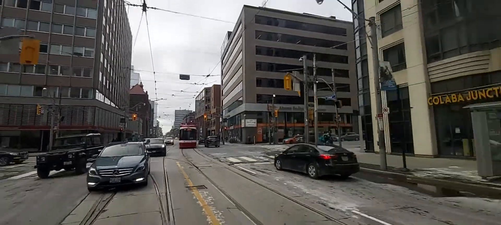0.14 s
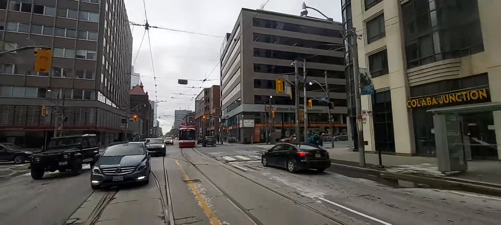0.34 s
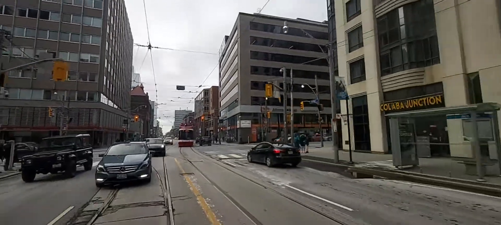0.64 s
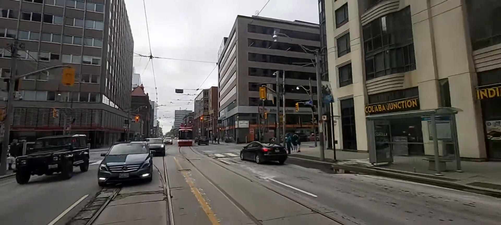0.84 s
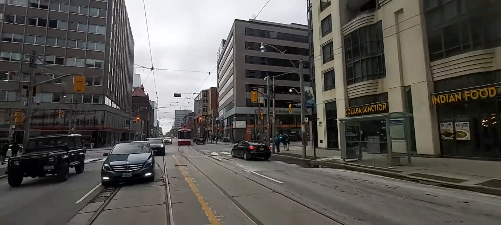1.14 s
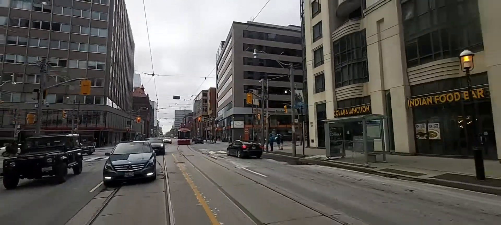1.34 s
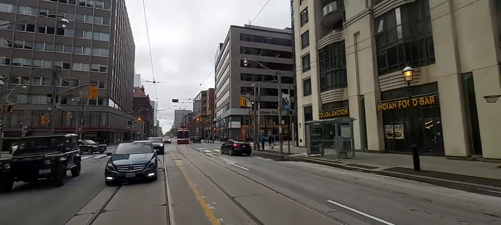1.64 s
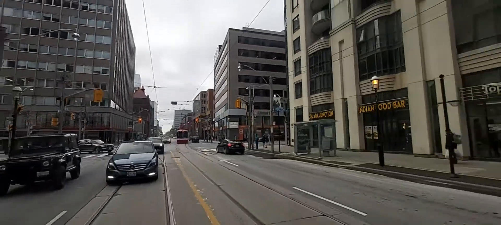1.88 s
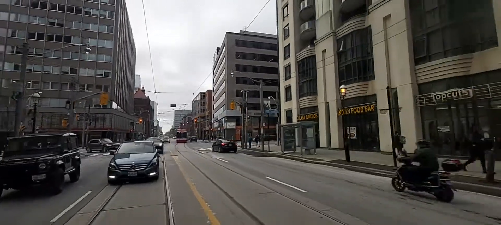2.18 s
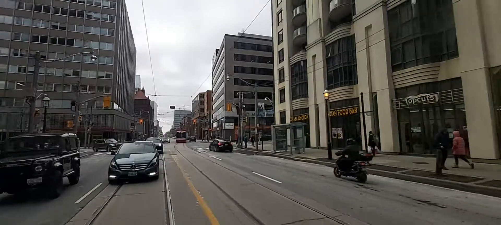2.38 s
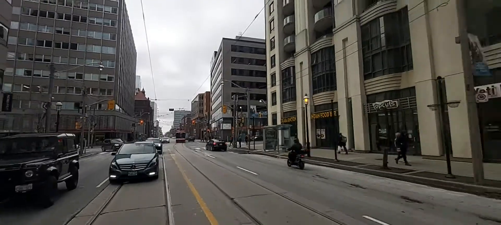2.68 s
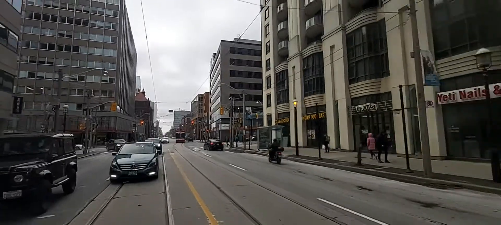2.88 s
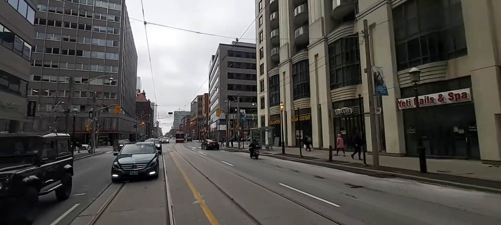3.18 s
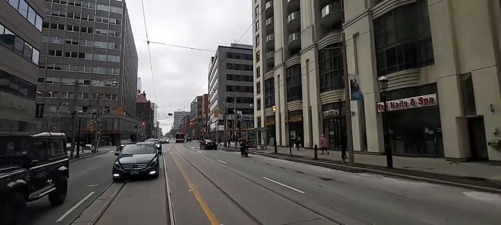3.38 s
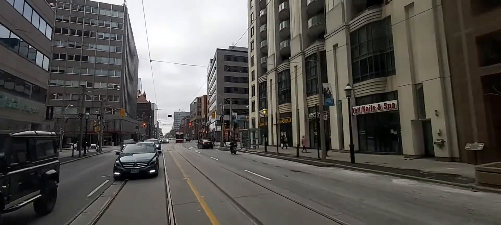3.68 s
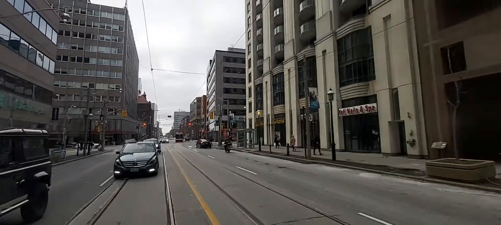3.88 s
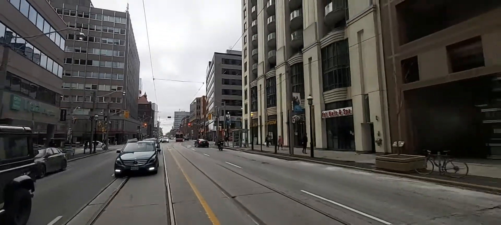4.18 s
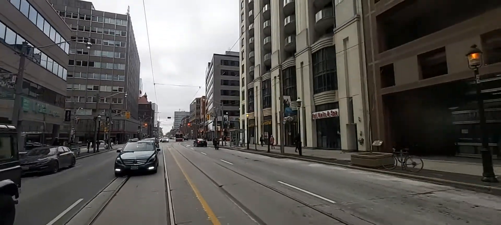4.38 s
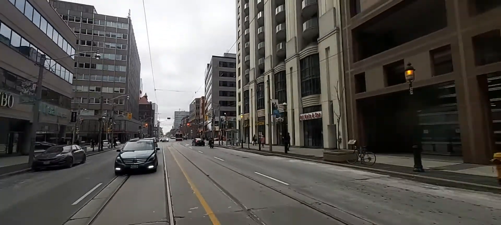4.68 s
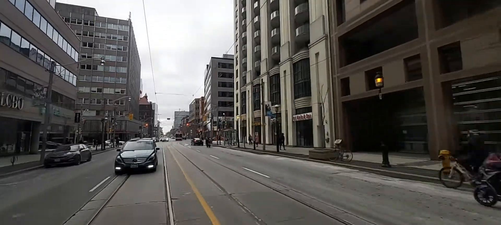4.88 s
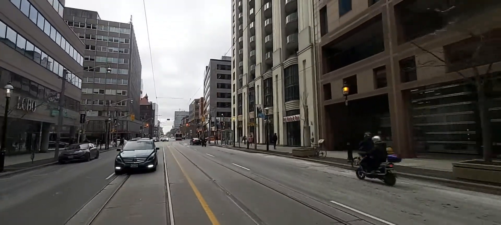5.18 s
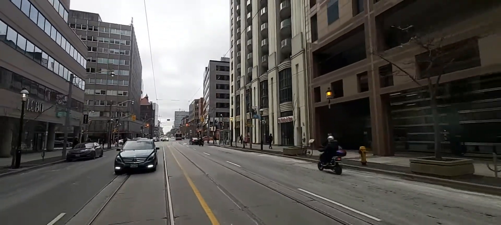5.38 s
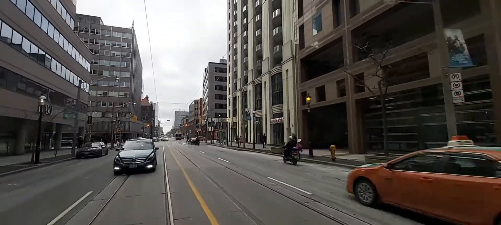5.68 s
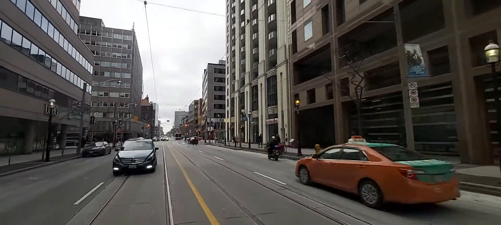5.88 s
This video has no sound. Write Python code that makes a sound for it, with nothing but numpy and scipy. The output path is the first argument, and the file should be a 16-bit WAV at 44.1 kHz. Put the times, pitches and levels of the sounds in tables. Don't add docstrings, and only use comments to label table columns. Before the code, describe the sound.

Inside a moving streetcar, microphones close behind the window, right side louder than left. A deep floor boom and soft wheel roar continue throughout, with very faint gear, fan and motor hum underneath. Small bumps and ticks open; from about 0.4 to 0.8 seconds a faint, thin flange squeal rises and catches twice. At 0.8 to 1.3 heavy thumps strike, with panels knocking and a sharp rattle near 1.15. It eases to light ticks, then a thud at 2.0 and a tight cluster of thumps and clatter at 2.45 to 2.8. Another bump at 3.2 leads to the heaviest run, 3.6 to 4.0, the body lurching and trim rattling. From 4.1 to 5.2 it is calmer, mostly rumble. Moderate thuds and knocks return at 5.25 to 5.85, while muffled traffic hiss, swelling faintly earlier, lifts and is loudest around 6.0.

```python
import sys
import numpy as np
from scipy import signal
from scipy.fft import next_fast_len
from scipy.io import wavfile
from scipy.ndimage import uniform_filter1d

SR = 44100
rng = np.random.default_rng(int(sys.argv[2]) if len(sys.argv) > 2 else 0)


def dump_mix(stems):
    frames = np.atleast_2d(stems).T
    limited = np.clip(frames, -1, 1)
    pcm = np.round(limited * 32767).astype(np.int16)
    wavfile.write(sys.argv[1], SR, pcm)


def voltage_ratio(decibels):
    exponent = np.asarray(decibels, float) / 20
    return 10 ** exponent


N = 266364


def rms_one(x):
    return x / np.sqrt(np.mean(x ** 2) + 1e-20)


def in_time(rows, **ends):
    s, level_db = np.transpose(rows)
    return np.interp(np.arange(N) / SR, s, level_db, **ends)


def at_hz(points, hz):
    f, value = np.transpose(points)
    return np.interp(np.log(hz), np.log(f), value)


def drift(rate):
    r = np.exp(-80 * np.pi * rate / SR)
    white = rng.standard_normal(N // 40 + 2002)
    slow = signal.lfilter([1], [1, -2 * r, r * r], white)[2000:]
    return np.interp(np.arange(N) / 40, np.arange(len(slow)), rms_one(slow))


def resonate(x, modes):
    out = 0
    for k, (hz, width, db) in enumerate(modes):
        r = np.exp(-np.pi * width / SR)
        gain = (1 - r * r) / 2
        section = [gain, 0, -gain, 1, -2 * r * np.cos(2 * np.pi * hz / SR), r * r]
        out = out + (-1) ** k * voltage_ratio(db) * signal.sosfilt([section, section], x + 1e-18)
    return out


def dying(times, heights, t60_s, rise_s):
    out = np.zeros(N)
    for s, height in zip(times, heights):
        i = round(s * SR)
        t = np.arange(min(N - i, SR // 3)) / SR
        out[i:i + len(t)] += height * (1 - np.exp(-t / rise_s)) * voltage_ratio(-60 * t / t60_s)
    return out


def swings(times, levels_db, pitches, swell_s, early_s):
    out, t = np.zeros(N), np.arange(SR // 4) / SR
    swell = (t / swell_s * np.exp(1 - t / swell_s)) ** 2.5
    for at, db, hz in zip(times, levels_db, pitches):
        swing = voltage_ratio(db) * swell * np.sin(2 * np.pi * hz * t)
        i = round((at - early_s) * SR)
        out[i:i + len(t)] += swing[:N - i]
    return out


# f/Hz, likeness (1 same, -1 opposite)
PORT_LIKENESS = [(140, 0.94), (250, 1), (410, 0.75), (620, 0.73), (820, -0.24), (1100, 0.096),
                 (1400, -0.059), (1800, -0.22), (2300, -0.011), (15000, -0.055)]
BAND_EDGES_HZ = 140 * 2 ** np.arange(0, 7, .32)


def stereo_bands(spectrum, patchy_db, envelope=lambda hz: 1, above=0, size=1):
    out, white = 0, rng.standard_normal((2, 2, N))
    edges = BAND_EDGES_HZ[BAND_EDGES_HZ > above][::-size][::-1]
    for k, (low, high) in enumerate(zip(edges, edges[1:])):
        hz = np.sqrt(low * high)
        band = signal.butter(2, [low, high], "band", fs=SR, output="sos")
        mid, side = signal.sosfilt(band, white[k % 2])
        alike = np.clip(at_hz(PORT_LIKENESS, hz), -1, 1)
        gain = voltage_ratio(at_hz(spectrum, hz) + patchy_db * drift(9.7)) * envelope(hz)
        out = out + gain * (np.sqrt(1 + alike) * mid + np.sqrt(1 - alike) * side * [[1], [-1]])
    return out


# t/s, sway level/dB
TRACK_SHAKE = [(0.0, -31.5), (0.76, -33), (0.79, -21), (1.39, -24), (1.5, -29), (1.66, -25.5),
               (1.72, -29.5), (2.22, -30), (2.49, -18), (3.55, -27.5), (3.83, -16), (3.92, -29),
               (3.95, -25.5), (4.91, -35), (5.67, -22), (5.7, -28), (5.92, -31.5), (6.04, -40)]


def track_shake():
    return in_time(TRACK_SHAKE)


def ringing_modes(modes, level_db, even):
    ringing = rms_one(resonate(rng.standard_normal(N + SR), modes)[SR:])
    swell = uniform_filter1d(np.abs(signal.hilbert(ringing, next_fast_len(N))[:N]), size=600)
    ringing = rms_one(ringing / (swell + 0.053) ** even)
    apart = rms_one(resonate(rng.standard_normal(N), modes))
    return voltage_ratio(level_db) * (ringing * np.ones((2, 1)) + voltage_ratio(-17.5) * apart * [[1], [-1]])


# f/Hz, width/Hz, level/dB
SWAY_MODES = [(54.1, 13.7, -1), (68.87, 10, 1)]
# f/Hz, width/Hz, level/dB
FLOOR_MODES = [(101.7, 29, 7), (125.9, 36, 3)]
# t/s, sway level/dB
BODY_LURCHES = [(.77, -18), (1.06, -13), (1.262, -30), (1.62, -27), (2.39, -26), (2.61, -35), (2.72, -23),
                (3.01, -22.5), (3.36, -31), (3.929, -10.5), (4.28, -31), (5.64, -33)]


def body_and_floor(track_db):
    s, lurch_db = np.transpose(BODY_LURCHES)
    lurch = dying(s, voltage_ratio(lurch_db), t60_s=0.39, rise_s=0.024)
    sway_db = 20 * np.log10(voltage_ratio(track_db - 1.0) + lurch)
    shake_db = track_db - track_db.mean()
    boom_db = np.minimum(-32.5 + 0.24 * shake_db + 0.88 * drift(7.1), -20)
    sway = ringing_modes(SWAY_MODES, sway_db, even=0.42)
    boom = ringing_modes(FLOOR_MODES, boom_db, even=0.6)
    deep_band = signal.butter(4, [38, 160], "band", fs=SR, output="sos")
    rumble = rms_one(signal.sosfilt(deep_band, rng.standard_normal(N)))
    return sway + boom + voltage_ratio(sway_db - 5.0) * rumble


# t/s, floor peak level/dB, floor f/Hz, panel thud level/dB, frame clank level/dB
JOINTS = [(0.41, -21, 106, -19.5, -51), (0.786, -5, 105.4, -13, -34.5), (0.838, -11.5, 108, -20, -46),
          (0.947, -15.5, 85, -28, -45), (1.075, -7.5, 110.8, -11.5, -29.5), (1.139, -16.5, 115.6, -24, -33),
          (1.85, -40, 132, -18.5, -36), (2.005, -19.5, 92.6, -28.5, -40),
          (2.461, -13.5, 125.2, -14.5, -27.5), (2.503, -10.5, 102.6, -15, -31),
          (2.712, -11, 109.4, -24.5, -39), (2.734, -11.5, 129.9, -23.5, -33.5), (2.766, -9, 96, -23, -28.5),
          (3.235, -17.5, 112, -21, -37), (3.594, -7, 105, -33, -40.5), (3.658, -17, 105, -22.5, -43),
          (3.699, -7.5, 128.3, -12.5, -26.5), (3.739, -20, 114.4, -29, -31.5),
          (3.844, -6, 113.6, -11.5, -30.5), (3.936, -6.5, 115, -15.5, -31.5), (3.978, -19, 95, -21, -35),
          (5.25, -15, 96.6, -18, -34), (5.499, -12.5, 115.6, -23, -34), (5.84, -21.5, 112.7, -17, -37)]
# t/s, peak level/dB, f/Hz
WORN_SPOTS = [(0.063, -18, 109.2), (0.201, -27.5, 105), (0.672, -23, 100.5), (1.258, -20, 105),
              (1.543, -21.5, 112.7), (1.601, -25.5, 107), (3.28, -21.5, 107.5), (3.459, -30, 107),
              (4.18, -16.5, 100), (4.469, -27, 108), (4.05, -18.5, 112), (4.68, -24, 114),
              (4.831, -24, 109.5), (4.951, -22.5, 105), (3.14, -23, 107), (5.929, -27.5, 130.4),
              (5.118, -21, 119.4), (5.386, -17, 108.4), (5.551, -19, 107)]
# floor peak level/dB, panel f/Hz
PANEL_PITCH = [(-21.5, 285), (-14.5, 240), (-11, 224)]
# f/Hz, width/Hz, level/dB
SIDE_PANELS = [(210.5, 11.3, -17.5), (241, 42, 0.5), (295.4, 27, -3), (350, 29, -10)]
# f/Hz, width/Hz, level/dB
UNDERFRAME = [(976, 43, -1), (1106, 120, -3), (1200, 150, -7), (1480, 92, -13)]


def joint_thumps():
    s, peak_db, floor_hz, thud_db, clank_db = np.transpose(JOINTS)
    panel_hz = np.interp(peak_db, *np.transpose(PANEL_PITCH))
    floor = swings(s, peak_db - 1.5, floor_hz, swell_s=0.028, early_s=0.01445)
    floor += swings(*np.transpose(WORN_SPOTS), swell_s=0.03, early_s=0.01474)
    panel = swings(s, thud_db - 7, panel_hz, swell_s=0.031, early_s=0.00832)
    jolt = rng.standard_normal((3, N))
    thud = rms_one(resonate(jolt[0], SIDE_PANELS))
    thud = thud * dying(s, voltage_ratio(thud_db - 9.5), t60_s=0.47, rise_s=0.0042)
    clank = rms_one(resonate(jolt[1:] - 0.35 * jolt[:0:-1], UNDERFRAME))
    clank = clank * dying(s, voltage_ratio(clank_db - 5.5), t60_s=0.31, rise_s=0.00088)
    return floor + panel + thud + clank


# t/s, peak level/dB, dull part level/dB, left-right level/dB
PANEL_KNOCKS = [(0.0044, -38, -8.5, -3.5), (0.3022, -39.5, 1.5, -4.5), (0.7901, -36.5, 4.5, -5),
                (0.848, -32.5, -3, -2.5), (0.919, -42, 2, -7), (1.049, -44.5, 6, -4.5),
                (1.0984, -42.5, 5.5, -4), (1.143, -26.5, -6.5, 0), (1.2181, -43.5, 8, -2.5),
                (1.2704, -32.5, -6.5, -5), (1.2994, -44, -7, -3), (1.6844, -38, -0.5, -0.5),
                (2.0687, -43, 8, -6), (2.2428, -36.5, 5.5, -1.5), (2.3567, -39, -6, 4),
                (2.4897, -31, 0.5, -5.5), (2.55, -28.5, -1.5, 0), (2.7617, -34.5, 4, -3.5),
                (2.7764, -33, -1, -2), (3.1193, -39, -1, -5), (3.3003, -43.5, 6, -1), (3.5616, -40, -9, -3),
                (3.7414, -36.5, -1, -4.5), (3.8142, -39, 7.5, 0), (3.8816, -36.5, -2.5, 0),
                (3.9923, -34.5, 2, -3.5), (4.0457, -40, -21, -4), (5.474, -34, 1.5, -2),
                (5.6095, -30, 0.5, -2)]
# t/s, peak level/dB
LIGHT_KNOCKS = [(0.182, -48.5), (0.3594, -48.5), (0.9797, -44.5), (1.1764, -43), (1.347, -42.5), (1.4, -47),
                (1.629, -50), (1.8977, -46), (1.9544, -44), (2.114, -48), (2.856, -44), (3.04, -43),
                (3.699, -41), (4.0934, -68), (4.358, -51.5), (5.4194, -48), (5.7478, -49)]
# f/Hz, level/dB per Hz
KNOCK_COLOUR = [(350, -28), (600, 9), (866, -4), (1230, -7.5), (1640, -15.5), (2640, -3), (4430, -18),
                (4810, -21), (11200, -36.5), (15500, -50)]
# f/Hz, width/Hz, level/dB
TRIM_MODES = [(3400, 100, -15.5), (4760, 450, 1), (6710, 1300, -7.5)]


def rattles():
    light = [(s, db, 1.5, -1.5) for s, db in LIGHT_KNOCKS]
    s, peak_db, dull_db, pan_db = np.transpose(sorted(list(PANEL_KNOCKS) + light))
    t60_s = 0.29
    tick = dying(s, voltage_ratio(peak_db), t60_s=0.06, rise_s=.0006)
    bright = voltage_ratio(-5.0) * tick + voltage_ratio(-3.5) * dying(s, voltage_ratio(peak_db), t60_s, rise_s=0.0015)
    sheen_height = voltage_ratio(peak_db - 23 - 0.2 * (peak_db + 42))
    sheen = dying(s, sheen_height, t60_s=0.036, rise_s=.0004)
    sheen = sheen + voltage_ratio(-1) * dying(s, sheen_height, 0.81 * t60_s, rise_s=.002)
    sheen = voltage_ratio(26.0) * sheen
    dull = dying(s, voltage_ratio(peak_db + dull_db - 6.0), 1.4 * t60_s, rise_s=0.0028) + voltage_ratio(-12.0) * tick

    def decay(hz):
        if hz > 8000:
            return sheen
        return bright if hz > 3800 else dull

    knock = stereo_bands(KNOCK_COLOUR, patchy_db=0.6, envelope=decay, above=600, size=2)
    trim = voltage_ratio(-14.5) * rms_one(resonate(rng.standard_normal((2, N)), TRIM_MODES)) * bright
    pan = np.interp(np.arange(N) / SR, s, pan_db + 3.0) / 2
    chatter = voltage_ratio(1.8 * drift(250) - 0.9)
    return chatter * (voltage_ratio(14.5) * knock + trim) * voltage_ratio(np.array([pan, -pan]))


# f/Hz, level/dB per Hz
WHEEL_ROAR = [(140, -5), (230, -1), (330, -2), (400, -10), (680, -13), (880, -20.5), (1200, -19),
              (1500, -24), (2300, -24), (3500, -29.5), (4200, -37), (7000, -63.5), (11000, -80.5),
              (15500, -90.5)]


def wheel_roar(shake_db):
    tyres_db = np.interp(np.arange(N) / SR, [4.8, 6.24], [0, 4.5])
    drum = voltage_ratio(-13 + 0.17 * shake_db + 0.4 * tyres_db)
    wheels = voltage_ratio(-12 + 0.1 * shake_db + tyres_db)
    return stereo_bands(WHEEL_ROAR, patchy_db=1.5, envelope=lambda hz: drum if hz < 390 else wheels)


# t/s, level/dB
FLANGE_SQUEAL = [
    (.41, -70),
    (.44, -50),
    (.49, -44),
    (.54, -53),
    (.65, -60),
    (.70, -51),
    (.735, -57),
    (.765, -46),
    (.81, -66),
]


def flange_squeal():
    hz = 3465 + 470 * (np.arange(N) / SR - FLANGE_SQUEAL[0][0])
    level = voltage_ratio(in_time(FLANGE_SQUEAL, left=-120, right=-120) - 5.5 + 2.5 * drift(25))
    tone = level * np.sin(2 * np.pi * np.cumsum(hz + 18 * drift(60)) / SR)
    return np.array([tone * voltage_ratio(3.5), np.roll(tone, 3) * voltage_ratio(10.0)])


# f/Hz, width/Hz, level/dB, left-right level/dB
GEAR_AND_FAN = [(285, 5.1, -42, -7.5), (336.6, 8.6, -43.5, -3), (650, 31, -51, 9), (2314, 26, -63, -13.5),
                (4850, 130, -70, 7)]


def gear_and_fan_hums():
    white = rng.standard_normal((2, N))
    white[1] += 0.77 * white[0]
    out = 0
    for hz, width, db, pan in GEAR_AND_FAN:
        tone = rms_one(resonate(white / [[1], [1.8]], [(hz, width, 0)]))
        out = out + voltage_ratio(db + np.array([[pan], [-pan]]) / 2) * tone
    return out


# f/Hz, rms level/dB, left-right level/dB
MOTOR_LINES = [(793, -60, -10), (951, -48, 8), (1070, -62, -6)]


def motor_whines():
    out = 0
    for hz, db, pan in MOTOR_LINES:
        tone = np.sin(2 * np.pi * np.cumsum(hz + 1.5 * drift(3.93)) / SR)
        tone = tone * voltage_ratio(db + 2.2 + 1.6 * drift(5.5))
        out = out + tone * voltage_ratio(np.array([[pan / 2], [-pan / 2]])) * [[1], [-1]]
    return out


# loudest t/s, hiss level/dB, swell/(dB/s), fade/(dB/s)
STREET_PASSES = [
    (.6, -67.5, 200, 12),
    (1.25, -70, 9, 90),
    (2.37, -71, 70, 12),
    (2.79, -67, 58, 200),
    (3.9, -70, 28, 43),
    (4.98, -74.5, 99, 44),
    (5.52, -67, 49, 30),
    (6.04, -55.5, 54, 40),
]


def passing_db():
    t = np.arange(N) / SR
    power = voltage_ratio(2 * -84)
    for s, db, swell, fade in STREET_PASSES:
        power = power + voltage_ratio(2 * (db - np.maximum(swell * (s - t), fade * (t - s))))
    return 10 * np.log10(power)


# f/Hz, level/dB per Hz
HISS_COLOUR = [(2350, -25), (4000, 1.5), (6000, -2.5), (8000, -5.5), (10000, -5.5), (12500, -10),
               (14500, -16.5), (15800, -12)]


def street_hiss():
    air_db = passing_db()
    near = voltage_ratio(0.21 * (air_db + 69))
    hiss = stereo_bands(HISS_COLOUR, patchy_db=1.5, envelope=lambda hz: near if hz > 9000 else 1, above=3700)
    return voltage_ratio(air_db + 12.0) * rms_one(hiss)


def scene():
    track_db = track_shake()
    under = body_and_floor(track_db) + joint_thumps()
    under = np.array([np.roll(under[0], 9), under[1]])
    roar = wheel_roar(track_db - track_db.mean())
    tones = flange_squeal() + gear_and_fan_hums() + motor_whines()
    return under + rattles() + roar + tones + street_hiss()


# f/Hz, width/Hz, level/dB
LEFT_PORT_COLOUR = [(1830, 210, -10), (2100, 230, 4.5), (2450, 1500, -5), (3660, 2400, -6),
                    (5260, 1400, -0.5)]
# f/Hz, width/Hz, level/dB
RIGHT_PORT_COLOUR = [(1160, 1300, -1), (3650, 420, 3.5), (3837, 580, -11), (6550, 430, 3.5)]


def port(x, bells):
    for hz, width, db in bells:
        a, w = voltage_ratio(db / 2), 2 * np.pi * hz / SR
        k = np.sin(w) * width / hz / 2
        middle = -2 * np.cos(w)
        x = signal.lfilter([1 + k * a, middle, 1 - k * a], [1 + k / a, middle, 1 - k / a], x)
    return x


def roll_off(x):
    return signal.sosfilt(signal.butter(12, 15720, fs=SR, output="sos"), x)


def record(dry):
    left = voltage_ratio(0.22) * port(dry[0], LEFT_PORT_COLOUR)
    right = voltage_ratio(0.88) * port(dry[1], RIGHT_PORT_COLOUR)
    heard = np.array([left, right])
    return roll_off(1.702 * np.tanh(heard / 1.498))


dry = scene()
out = record(dry)
dump_mix(out)
```